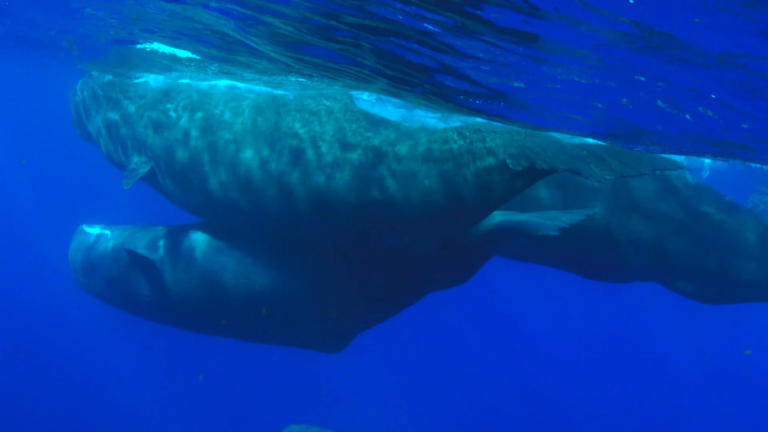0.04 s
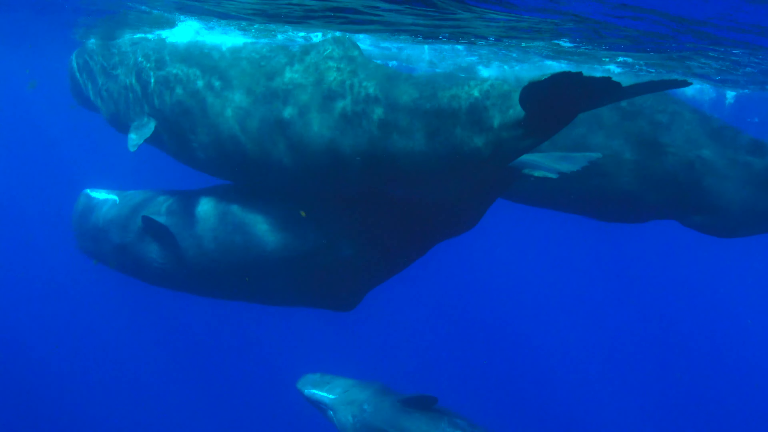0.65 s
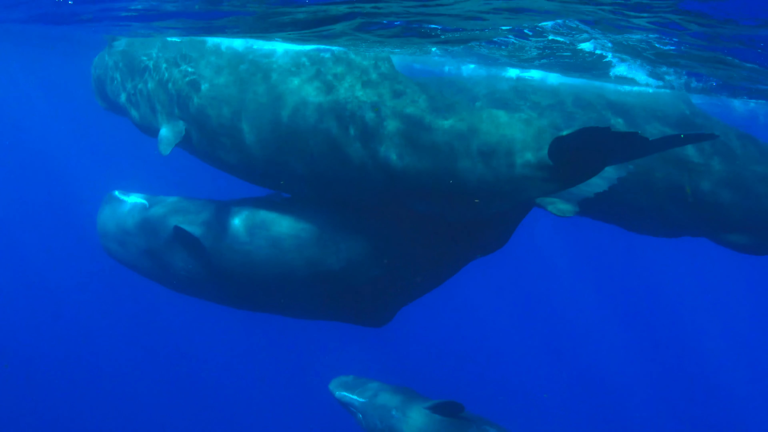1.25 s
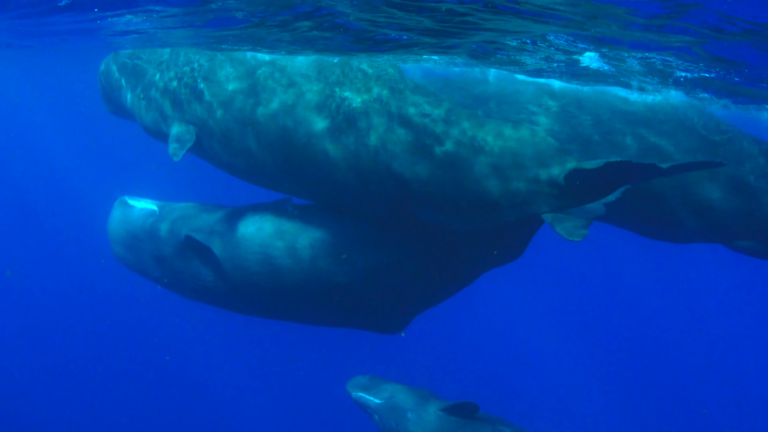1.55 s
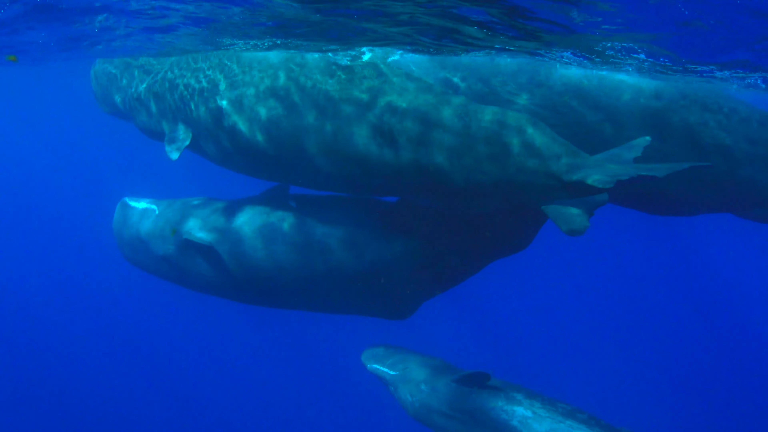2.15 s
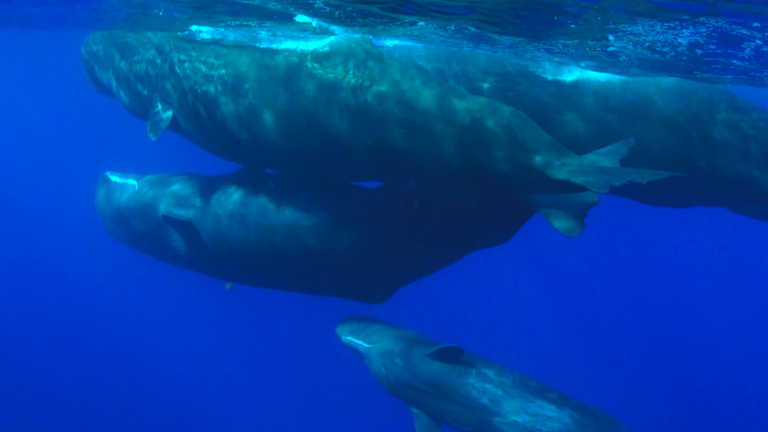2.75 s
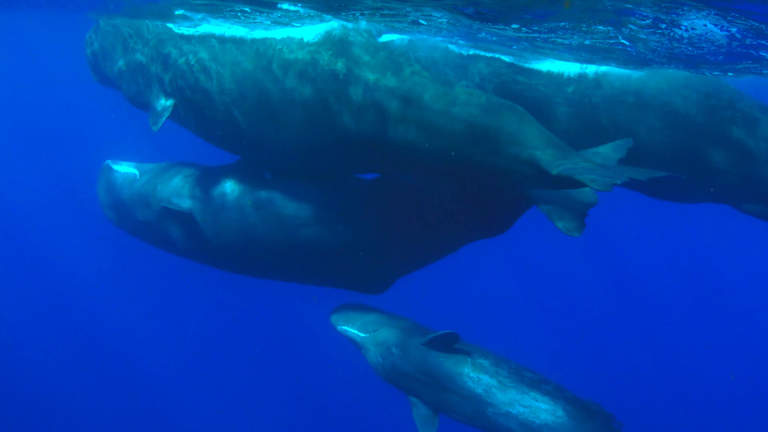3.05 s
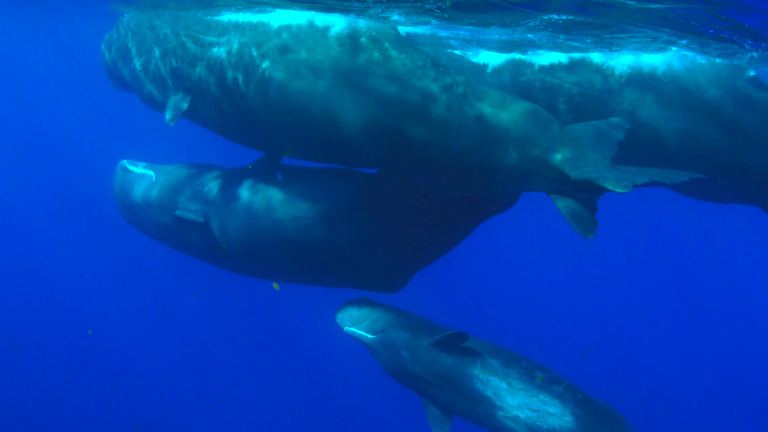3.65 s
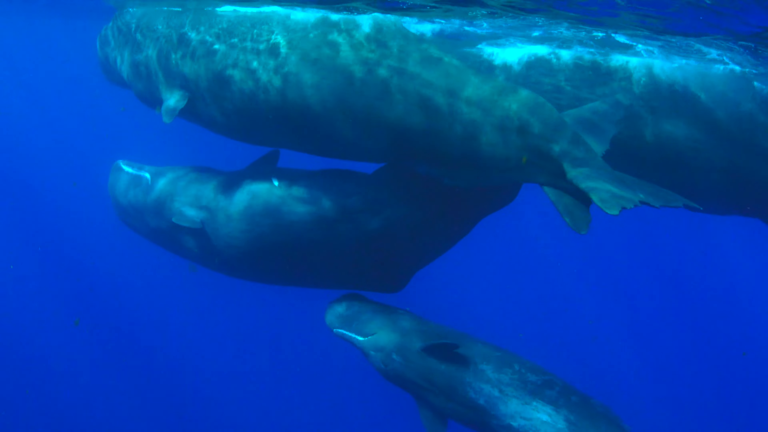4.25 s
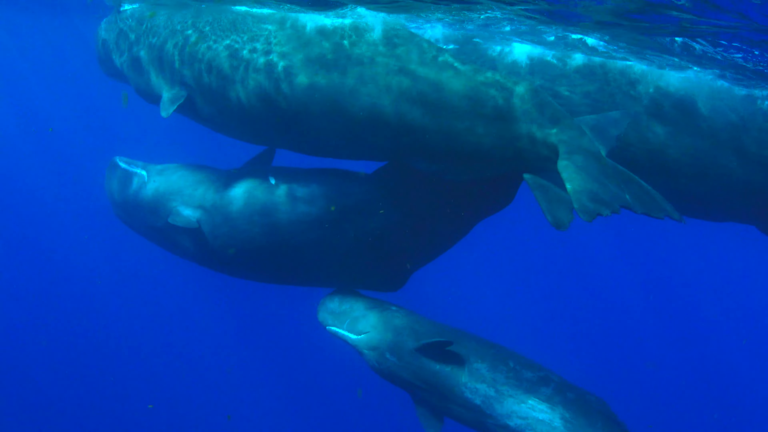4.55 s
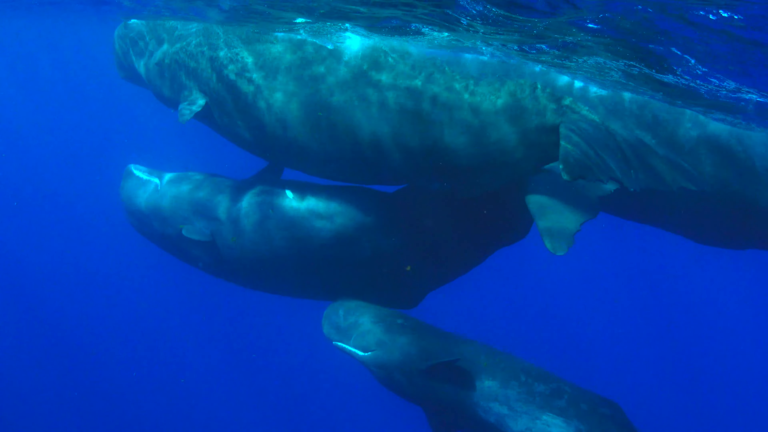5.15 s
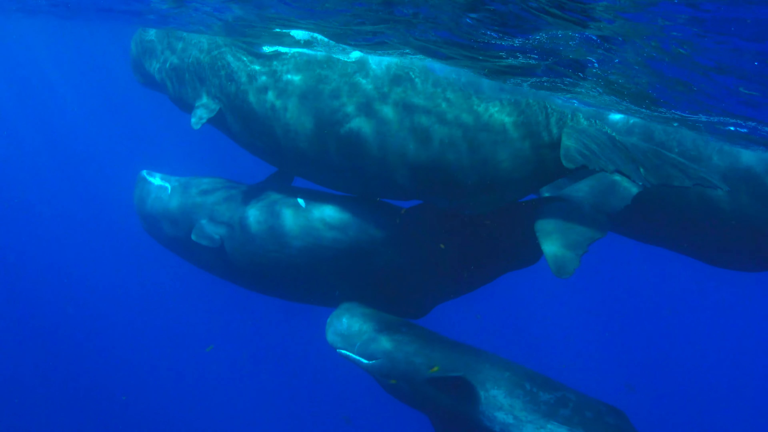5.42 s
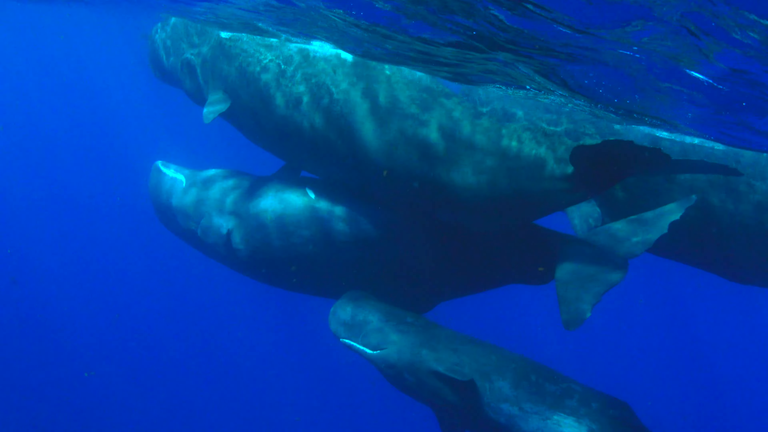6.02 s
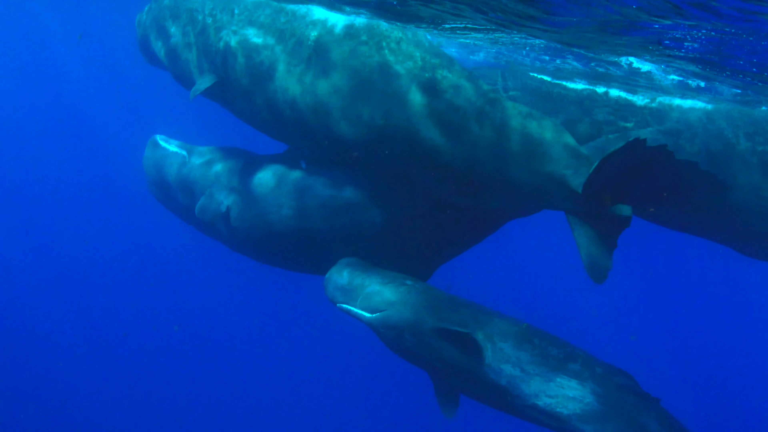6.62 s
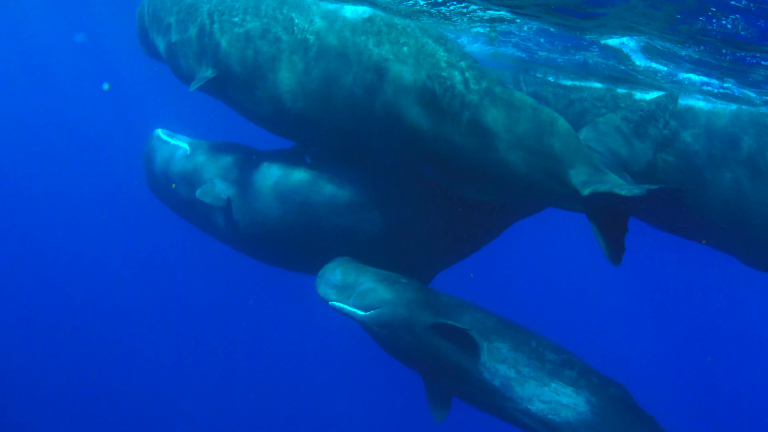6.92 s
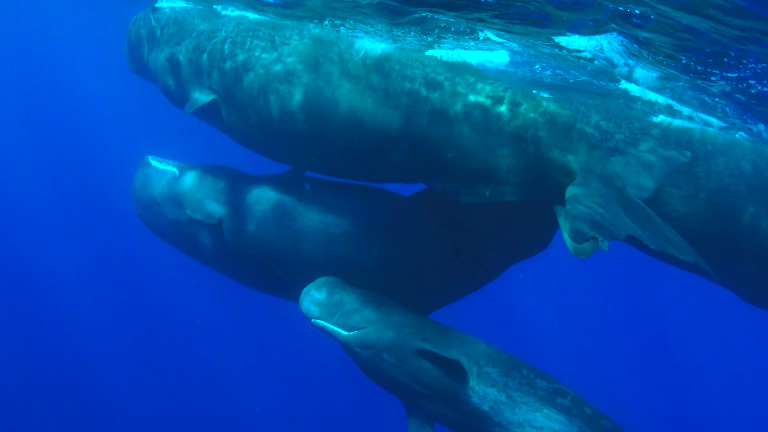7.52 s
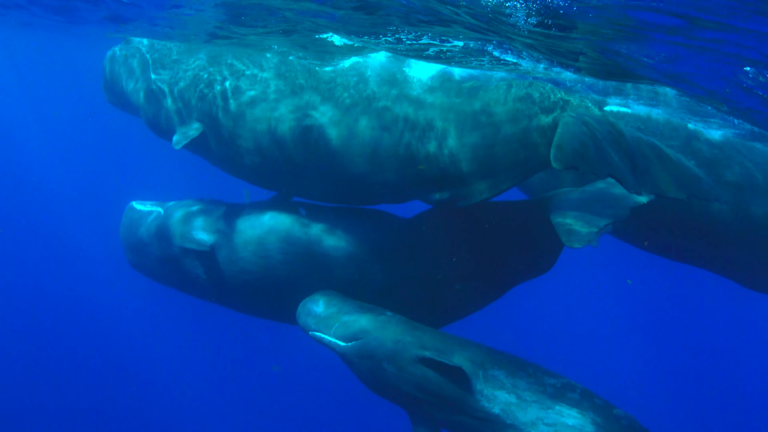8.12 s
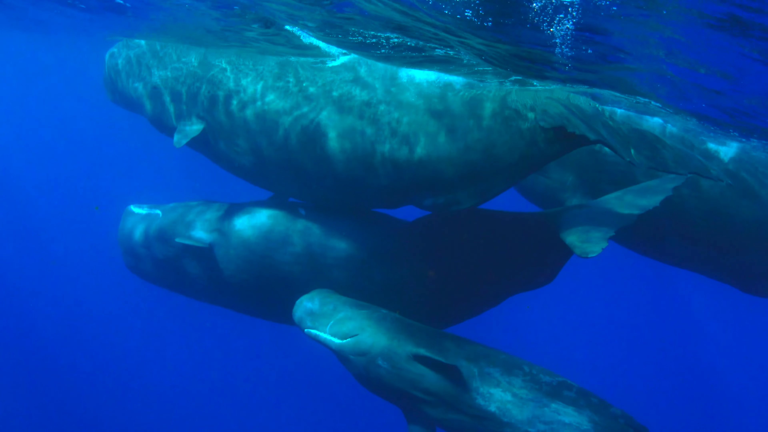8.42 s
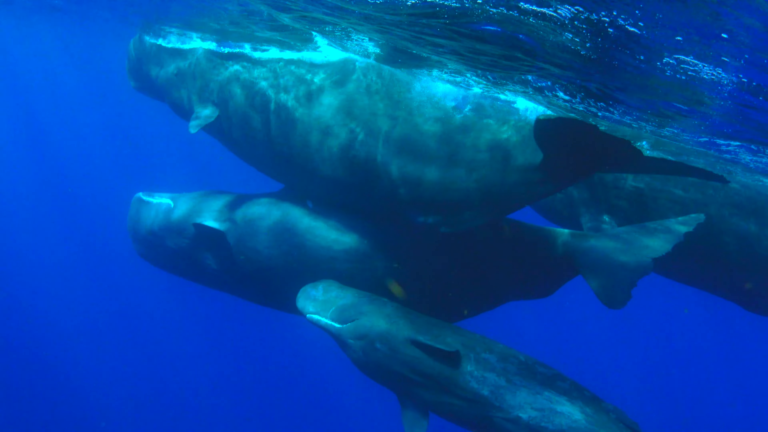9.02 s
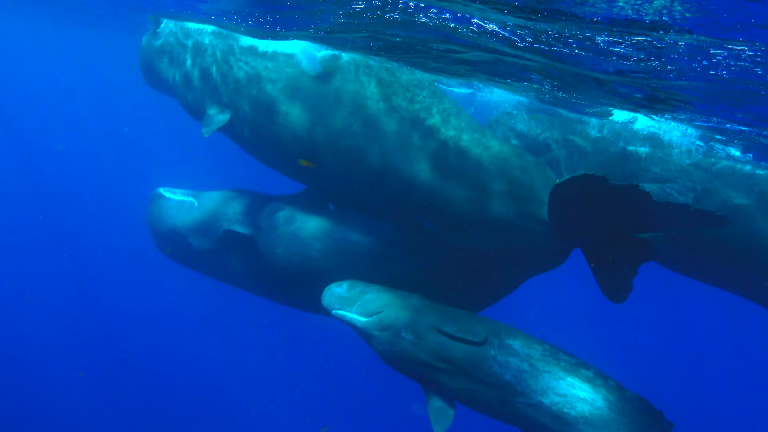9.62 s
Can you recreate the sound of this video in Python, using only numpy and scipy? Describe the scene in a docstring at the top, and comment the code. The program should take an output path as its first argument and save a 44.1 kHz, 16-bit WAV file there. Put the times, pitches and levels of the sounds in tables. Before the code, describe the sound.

A soft, steady underwater rumble with a light hiss runs throughout, heard through a camera housing in the open sea. From 0.2 to 0.7 seconds a nearby sperm whale makes four loud, snappy clicks, each ringing briefly. Water swishes and gurgles around 1 second, with soft dull bumps at 0.8 and 2.4 seconds. Five loud, rounder clicks follow from 3.4 to 4.2 seconds. Between 6.2 and 7.1 seconds come quieter, thin clicks, overlapped by a fast, hollow burst of about ten clicks from 6.3 to 6.8 seconds. Water surges gently along the housing near 5.7 and 7.6 seconds. Two more loud, sharp clicks land at about 9.4 and 9.6 seconds, with a weak one between them. Tiny bubbles pop and gurgle here and there, and a lens motor gives a very faint, high whine in short runs.

```python
"""In the open sea, sperm whales click in short groups and one fast burst beside a swimmer's camera.
Each click is a pressure pulse that rattles through the watertight housing and leaves its modes ringing.
Water rumbles in the same housing, bumps it and swishes past in slow surges; bubbles fizz and gurgle.
The stepping motor of the lens whines faintly in short runs."""
import sys
import numpy as np
from scipy.fft import rfft, irfft, next_fast_len
from scipy.io import wavfile
from scipy.ndimage import uniform_filter1d, map_coordinates

SR = 44100
rng = np.random.default_rng(int(sys.argv[2]) if len(sys.argv) > 2 else 0)


def transcribe(signal):
    """Save signal, clipped to [-1, 1], as a 16-bit WAV file at the path in sys.argv[1]."""
    frames = np.atleast_2d(signal).T
    limited = np.clip(frames, -1, 1)
    pcm = np.round(limited * 32767).astype(np.int16)
    wavfile.write(sys.argv[1], SR, pcm)


N = 430857

# swells of stirred, bubbly water: (time [s], standard deviation [s], level [dB])
STIRRING = [(.82, .12, -57.5), (1.06, .18, -58), (1.3, .08, -59), (3.78, .18, -61), (6.87, .12, -60),
            (9.25, .12, -65.5)]


def amp(db):
    """Amplitude ratio of a level in decibels."""
    return 10 ** (np.asarray(db) / 20)


def unit(x):
    """Normalisation to rms 1."""
    return x / np.sqrt(np.mean(x ** 2) + 1e-20)


def along(points, hz):
    """Interpolation of (frequency [Hz], value) points on a logarithmic frequency axis."""
    f, values = np.transpose(points)
    return np.interp(np.log(hz + 1), np.log(f), values)


def wobble(knots):
    """Slow random modulation: a spline through Gaussian knots spread over the scene."""
    return map_coordinates(rng.standard_normal(int(knots) + 4), [np.linspace(0, knots, N)])


def swells(rows):
    """Envelope of Gaussian swells, which add in power as incoherent sources do."""
    t = np.arange(N) / SR
    return np.sqrt(sum((amp(db) * np.exp(-.5 * ((t - s) / width) ** 2)) ** 2 for s, width, db in rows))


def filtered(x, response):
    """Linear filtering: the spectrum of x times a frequency response."""
    size = next_fast_len(x.shape[-1] + SR // 4)
    return irfft(rfft(x, size) * response(np.fft.rfftfreq(size, 1 / SR)), size)[..., :x.shape[-1]]


def resonances(rows, hz):
    """Gain of steep-sided resonances that add in power."""
    return np.sqrt(sum((amp(db) / (1 + (2 * (hz - f) / width) ** 2)) ** 2 for f, width, db in rows))


def causal(gain):
    """The minimum-phase response with this gain, found by folding the cepstrum."""
    cepstrum = irfft(np.log(np.maximum(gain, 1e-6)))
    half = len(cepstrum) // 2
    return np.exp(rfft(np.r_[cepstrum[0], 2 * cepstrum[1:half], cepstrum[half], np.zeros(half - 1)]))


def add(track, s, x):
    """Superposition of x on the track at s seconds."""
    part = track[..., round(s * SR):][..., :x.shape[-1]]
    part += x[..., :part.shape[-1]]


def rush(gain, side_db):
    """Coloured stereo noise of rms 1; the side level sets the coherence of the channels."""
    mid, side = filtered(rng.standard_normal((2, N)), gain)
    return unit(np.array([mid + amp(side_db) * side, mid - amp(side_db) * side]))


def steady_flow():
    """Flow noise: a broadband rumble and hiss, and a drone where it excites housing resonances."""
    # noise spectra: (frequency [Hz], relative level [dB])
    rumble_spectrum = [(20, -44), (60, -29), (110, -15.5), (160, -7), (220, -4), (310, 5.5), (520, -0.5),
                       (750, 2), (900, -3), (1300, -6.5), (2000, -29.5), (3000, -34), (6000, -42)]
    hiss_spectrum = [(30, -56), (300, -2.5), (1500, 2.5), (3500, 0), (7000, -2), (10000, -3), (15500, -5)]
    # flow-driven resonances: (frequency [Hz], width [Hz], gain [dB])
    drone_modes = [(441, 72, -7.5), (605, 70, -14), (765, 95, -9), (930, 60, -10), (1015, 66, 0),
                   (1102, 80, -1.5), (1440, 110, -20), (1910, 90, -22)]
    rumble = amp(-68) * rush(lambda hz: amp(along(rumble_spectrum, hz)), side_db=-17)
    drone = amp(-59.5 + 0.56 * wobble(64.03)) * rush(lambda hz: resonances(drone_modes, hz), side_db=-8)
    hiss = amp(-61.5) * rush(lambda hz: amp(along(hiss_spectrum, hz)), side_db=0.5)
    return rumble + drone + hiss


def swishes():
    """Amplitude-modulated noise: stirred water swells and fades unevenly."""
    # spectrum of the water: (frequency [Hz], relative level [dB])
    spectrum = [(40, -35.5), (150, -17.5), (220, -7.5), (300, 1.5), (650, 3.5), (800, 4.5), (1000, 2.5),
                (1300, -3.5), (2000, -15.5), (7000, -18), (15000, -22)]
    envelope = swells(STIRRING) * amp(1.95 * wobble(300))
    return envelope * rush(lambda hz: amp(along(spectrum, hz)), side_db=-18.5)


def surges():
    """Forced vibration: water sliding along the housing drives its resonances."""
    # smooth surges: (time [s], standard deviation [s], level [dB])
    passes = [(5.7, 0.19, -62.5), (7.62, 0.13, -55.5), (7.88, 0.18, -63)]
    # resonances they excite: (frequency [Hz], width [Hz], gain [dB])
    modes = [(322, 92, -5), (427, 67, 6), (573, 82, 5), (716, 210, -4.5), (1433, 83, -1), (1945, 580, -21)]
    envelope = swells(passes) * amp(1.6 * wobble(140))
    return envelope * rush(lambda hz: resonances(modes, hz), side_db=-28)


def tick(hz, t60, size=1024):
    """A decaying puff of noise through one resonance: a pop of peak 1, different in each channel."""
    puff = rng.standard_normal((2, size)) * amp(-60 * np.arange(size) / SR / t60)
    pop = filtered(puff, lambda f: resonances([(hz, 0.15 * hz, 0)], f))
    return pop / np.abs(pop).max()


def fizz(count=200):
    """A random point process: small bubbles pop, more often where the water is stirred."""
    # the clearest pops: (time [s], peak level [dB], frequency [Hz])
    clear_pops = [(1.305, -44, 7000), (2.289, -48, 6960), (3.155, -44.5, 5330), (3.294, -41, 6000),
                  (4.921, -46, 7200), (5.307, -48, 5650), (7.927, -40, 6860), (8.926, -48, 5360)]
    out = np.zeros((2, N))
    stir = swells(STIRRING)
    cumulative_rate = np.cumsum(0.025 + (stir / stir.max()) ** 4)
    for quantile, strength, pitch in zip(rng.random(count), *rng.standard_normal((2, count))):
        s = np.searchsorted(cumulative_rate, quantile * cumulative_rate[-1]) / SR
        add(out, s, amp(-54 + 3 * strength) * tick(7500 * np.exp(.3 * pitch), t60=.025))
    for s, db, hz in clear_pops:
        add(out, s, amp(db) * tick(hz, t60=0.026))
    return out


def gurgles():
    """Each bubble rings as a damped oscillator whose pitch rises slightly."""
    # ringing bubbles: (time [s], level [dB], frequency [Hz], T60 [s])
    bubbles = [(1.214, -43.5, 444, 0.23), (1.218, -45, 753, 0.11), (1.314, -33, 768, 0.062),
               (1.3, -47.5, 430, 0.11), (1.5, -50, 2020, 0.042), (3.715, -45, 1940, 0.038),
               (4.78, -47, 764, 0.049), (5.06, -43.5, 760, 0.046), (6.89, -44, 874, .08),
               (8.88, -52, 1340, 0.058), (9.2, -51, 777, 0.11), (9.68, -46, 740, 0.039)]
    out, t = np.zeros(N), np.arange(SR // 4) / SR
    for s, db, hz, t60 in bubbles:
        envelope = amp(db - 60 * t / t60) * (1 - np.exp(-t / 0.0033))
        add(out, s, envelope * np.sin(2 * np.pi * hz * t * (1 + 0.054 * t)))
    return out


def bumps():
    """Soft impacts of water on the shell give dull noise that decays exponentially."""
    # impacts: (time [s], relative level [dB])
    impacts = [(0.791, -46.5), (2.363, -50), (2.413, -46)]
    spectrum = [(40, -58), (170, 7), (650, 21), (850, 14), (1300, -31)]  # (frequency [Hz], gain [dB])
    out, t = np.zeros(N), np.arange(SR // 4) / SR
    for s, db in impacts:
        thud = filtered(rng.standard_normal(len(t)), lambda hz: amp(along(spectrum, hz)))
        envelope = amp(db + 2 - 60 * t / 0.099) * (1 - np.exp(-t / 0.0028))
        add(out, s, envelope * unit(thud))
    return out


def lens_motor(step_hz=1396):
    """Periodic excitation: the focus motor whines at harmonics of its step rate."""
    # runs of the motor, silent unless the end follows the start: (start [s], end [s])
    runs = [(1.62, 1.76), (2.15, 2.25), (2.58, 2.64), (3.13, 3.3), (4.61, 4.8), (5.04, 5.2), (5.58, 5.56),
            (7.2, 7.33), (7.62, 7.82), (8.69, 8.3), (9.08, 9.2), (9.65, 11.5)]
    # partials of the whine: (harmonic number, rms level [dB])
    harmonics = [(4, -75.5), (5, -73.5), (6, -87), (8, -80), (9, -79)]
    t = np.arange(N) / SR
    running = sum(np.clip(np.minimum(t - start, end - t) / 0.014, 0, 1) for start, end in runs)
    phase = 2 * np.pi * step_hz * t + .3 * wobble(220)
    return running * sum(np.sqrt(2) * amp(db) * np.sin(k * phase) for k, db in harmonics)


def housing_gain(hz, knock_hz, knock_db):
    """Transmission through the housing: resonances, wall loss and destructive interference."""
    # broad resonances: (frequency [Hz], width [Hz], gain [dB])
    broad_modes = [(578, 42, -9.5), (1013, 87, -3.5), (1137, 30, -3.5), (1780, 3100, -17), (1900, 96, -6),
                   (2850, 520, -2), (3085, 360, -3), (3683, 430, 2.5), (4043, 190, 1.5), (4450, 1130, -4),
                   (5450, 410, -4.5), (5910, 530, 1.5), (6405, 160, 0), (6860, 870, -6), (7793, 770, -6),
                   (8660, 130, -10), (9630, 1530, -9.5), (11900, 1800, -15), (14400, 1500, -20.5),
                   (14800, 1700, -28)]
    # transmission of the wall: (frequency [Hz], gain [dB])
    wall = [(30, -15), (300, -9), (660, -4), (810, 3.16), (1300, -4), (1650, 0), (3200, -1), (3900, -4),
            (4600, 0.5), (5600, 0.5), (7000, .5), (11000, 0.5)]
    # notches where paths cancel: (frequency [Hz], width [Hz], depth [dB])
    notches = [(2130, 130, 6), (3880, 90, 6), (4235, 110, 13), (4815, 70, 10), (5530, 100, 5),
               (6505, 80, 7), (8560, 160, 4)]
    notch_db = sum(depth * np.exp(-(2 * (hz - f) / width) ** 2) for f, width, depth in notches)
    return resonances([*broad_modes, (knock_hz, 155, knock_db)], hz) * amp(along(wall, hz) - notch_db)


def housing_ring(t, snap_db, crack_db):
    """Free vibration: each mode of the housing rings as hard as the pulse drives it."""
    # lightly damped modes: (frequency [Hz], relative level [dB], T60 [s])
    modes = [(1024, -52.0, 0.13), (1096, -55, 0.13), (1798, -59.2, 0.101), (1896, -64.6, 0.121),
             (2460, -61, 0.095), (2761, -63.5, 0.13), (3256, -49.5, 0.105), (3380, -51.0, 0.103),
             (4005, -51.0, 0.114), (5281, -52.3, 0.078), (5415, -52.4, 0.081), (5760, -54, 0.08),
             (5970, -47.5, 0.075), (6422, -54.6, 0.087), (6987, -58.1, 0.098)]
    drive = [(1500, 0), (2700, snap_db), (3400, snap_db), (4000, crack_db), (5500, 0)]
    ring = np.zeros((2, len(t)))
    for hz, db, t60 in modes:
        start_db = db + along(drive, hz) + rng.normal(0, 0.87)
        cycles = hz * t + rng.random() + .5 * rng.random((2, 1))
        ring += amp(start_db - 60 * t / t60) * np.sin(2 * np.pi * cycles)
    return ring * amp(-1.8) * (1 - np.exp(-t / .003))


def rattle(noise, envelope, passes=4):
    """Spectrum of dense reflections of energy 1, made colourless by repeated whitening and windowing."""
    cluster = noise * envelope
    for _ in range(passes):
        spectrum = rfft(cluster)
        white = irfft(spectrum / (np.abs(spectrum) + 1e-9))
        local_level = np.abs(uniform_filter1d(np.abs(white), size=61))
        cluster = envelope * white / (local_level + 1e-12)
    return rfft(cluster / np.linalg.norm(cluster, axis=1, keepdims=True))


def click_train():
    """Directivity colours each click: rows of time, level, knock frequency and four band gains."""
    # single clicks, the loud ones in groups: (time [s], relative level [dB], treble [dB], beam name)
    singles = [(0.1762, 15.5, -0.5, "snappy"), (0.4118, 15, 0, "snappy"), (0.5829, 14, 4, "snappy"),
               (0.7291, 14, 2.5, "snappy"), (3.43, 12, 4, "round"), (3.6387, 12, 0.5, "round"),
               (3.885, 12, 2.5, "round"), (4.066, 12, 3, "round"), (4.2014, 12.5, 1, "round"),
               (6.1663, -2, 1, "thin"), (6.3236, -4, 3, "hollow"), (6.4916, -2, 4, "thin"),
               (6.7856, -0.5, 9.5, "thin"), (6.9904, -0.4, 12, "thin"), (7.1213, 1.3, 9.5, "thin"),
               (9.3508, 15.5, 2.5, "snappy"), (9.5047, -1.5, 4, "thin"), (9.5941, 15, 1.5, "snappy")]
    # colour set by the whale and its aim: name -> (knock [Hz], knock [dB], snap [dB], crack [dB])
    beams = {"snappy": (797, -0.3, 1.5, -2.3), "round": (855, 3.23, 1.7, 2.2), "hollow": (836, -3.5, -4, 4),
             "thin": (785, -18, -1.5, 0)}
    # the fast, hollow burst: (time [s], relative level [dB])
    burst = [(6.3394, 4), (6.388, 2), (6.4231, 1.7), (6.4587, 0.8), (6.4867, 1.5), (6.529, 2.4),
             (6.5689, 3), (6.618, 4), (6.6822, 0.7), (6.7645, 3)]
    onset_s, onset_treble_db, dulling_db_per_s = burst[0][0], -1, 11
    dulled = [(s, db, onset_treble_db - dulling_db_per_s * (s - onset_s), "hollow") for s, db in burst]
    return [(s, db, *beams[beam], treble_db) for s, db, treble_db, beam in singles + dulled]


def whales(size=8192):
    """Multipath transmission turns each pressure pulse into a low knock, a bright rattle and a ring."""
    # wall motion at the two microphones, opposed against in phase: (frequency [Hz], side minus mid [dB])
    side_balance = [(1700, 3), (2800, 5), (3200, 6), (3650, -7), (4500, -6.5), (5500, 3), (6400, -2),
                    (7500, -2.5), (10000, -1.5)]
    direct_s, direct_db = 0.0017, 2.5  # the first arrival and its lead over the reflections
    early_s, late_db, late_t60_s = 0.0036, -31, 0.041  # reflections crowd in, then die quickly
    snap_hz, crack_hz, treble_hz = 2700, 3800, 12000
    out, t, hz = np.zeros((2, N)), np.arange(size) / SR, np.fft.rfftfreq(size, 1 / SR)
    paths, echoes = rng.standard_normal((2, 2, size))
    early = amp(direct_db * (t < direct_s)) * (t < early_s)
    late = amp(late_db - 60 * (t - early_s) / late_t60_s) * (t >= early_s)
    # a weak diffuse tail lingers in the middle of the range
    tail = rfft(echoes * amp(-46.5 - 60 * t / 0.12) * (1 - np.exp(-t / 0.006)))
    tail *= amp(along([(1600, 17.5), (3000, -7), (6400, 2), (9100, -5)], hz))
    # long waves move the whole shell at once and reach the left microphone first; short ones scatter
    lead = np.pi * hz * .00017
    push = np.exp(-2j * np.pi * hz * 0.00073) * np.array([np.cos(lead), 1j * np.sin(lead)])
    scatter = np.clip((hz - 1150) / 350, 0, 1)
    side_angle = np.arctan(amp(along(side_balance, hz)))
    spread = amp(0.55) * np.array([np.cos(side_angle), np.sin(side_angle)])
    for s, db, knock_hz, knock_db, snap_db, crack_db, treble_db in click_train():
        beam = [(1500, 0), (snap_hz, snap_db), (crack_hz, crack_db), (5500, 0), (treble_hz, treble_db)]
        response = causal(housing_gain(hz, knock_hz, knock_db) * amp(along(beam, hz)))
        shift = rng.standard_normal((2, size))  # the paths change from click to click
        reflections = rattle(paths + 0.357 * shift, early) + rfft(late * unit(paths + 1.9 * shift))
        arrivals = scatter * spread * (reflections + tail) + (1 - scatter) * push
        mid, side = irfft(arrivals * response) * (t < .09)
        click = np.array([mid + side, mid - side]) + housing_ring(t, snap_db, crack_db)
        add(out, s, amp(db) * click)
    return out * amp([[-.5], [.9]])  # slightly louder on the right


def scene():
    """Superposition of the nearby whales, the water all around and the faint motor."""
    return whales() + steady_flow() + swishes() + surges() + fizz() + gurgles() + bumps() + lens_motor()


def record(dry):
    """Band limiting: the camera acts as a steep low-pass filter."""
    cutoff_hz = 16000
    return filtered(dry, lambda hz: 1 / (1 + (hz / cutoff_hz) ** 120))


dry = scene()
out = record(dry)
transcribe(out)
```